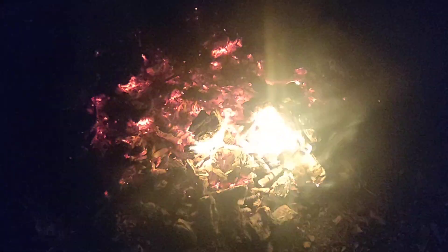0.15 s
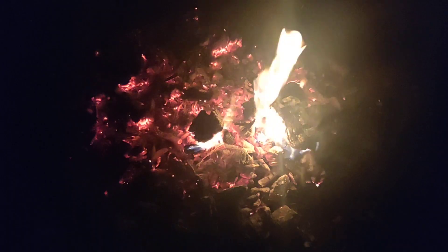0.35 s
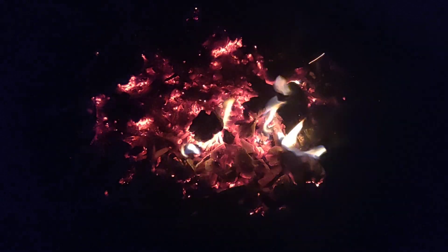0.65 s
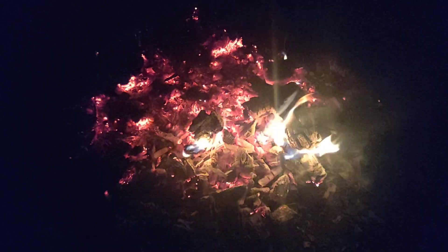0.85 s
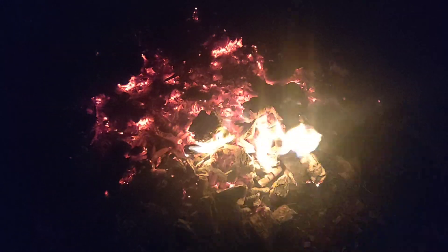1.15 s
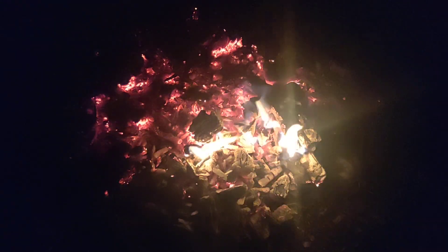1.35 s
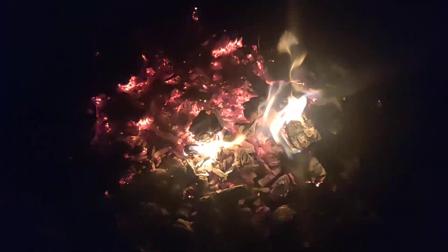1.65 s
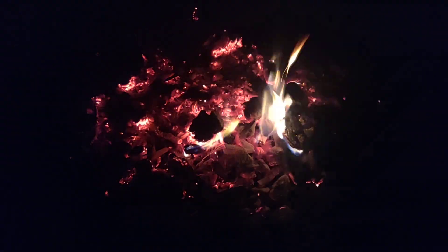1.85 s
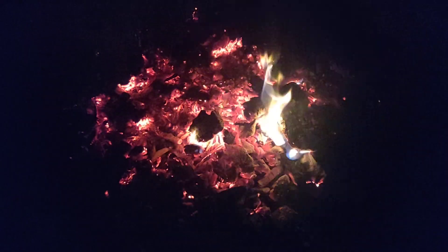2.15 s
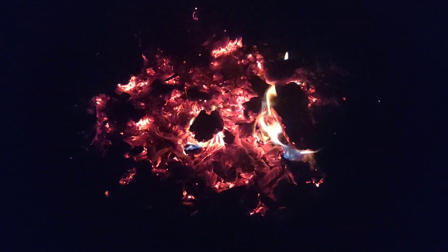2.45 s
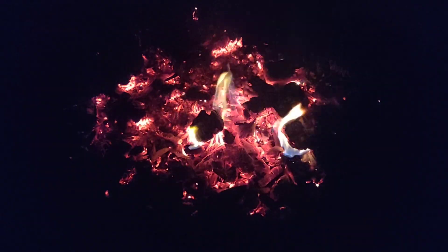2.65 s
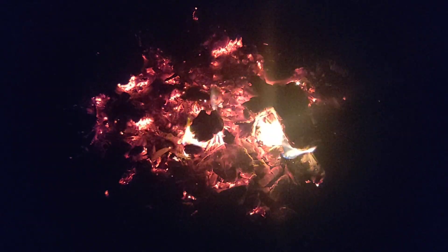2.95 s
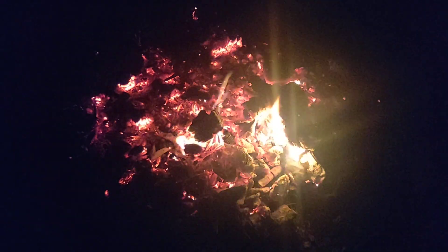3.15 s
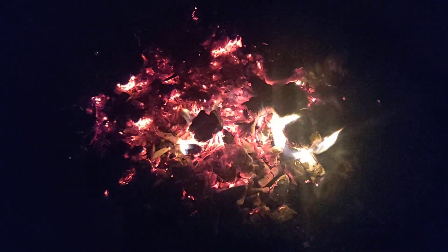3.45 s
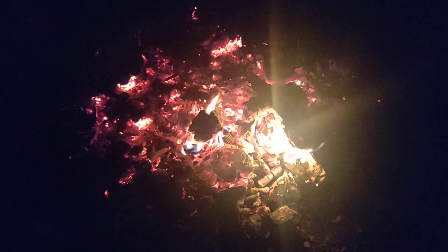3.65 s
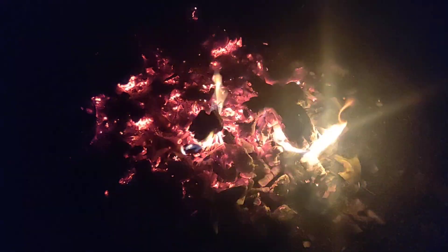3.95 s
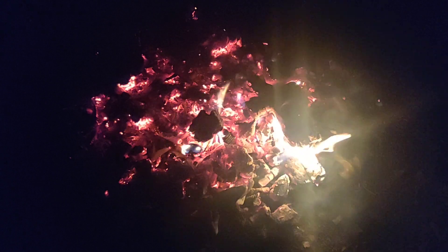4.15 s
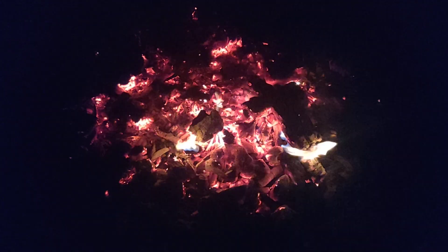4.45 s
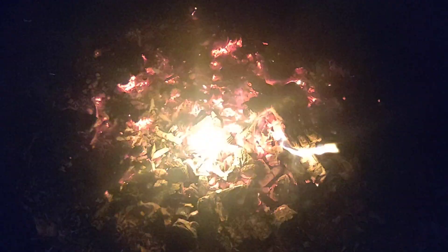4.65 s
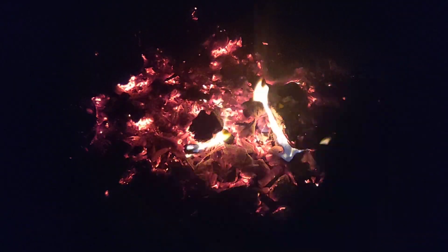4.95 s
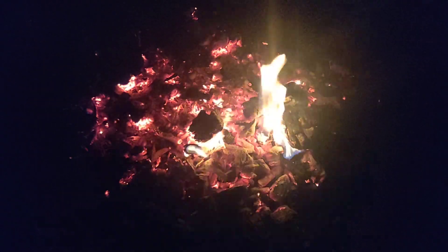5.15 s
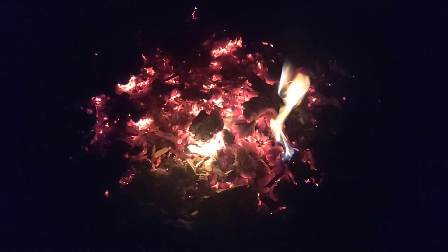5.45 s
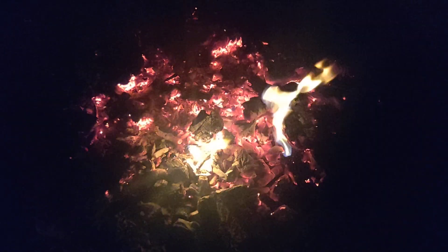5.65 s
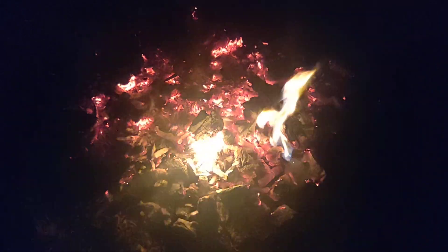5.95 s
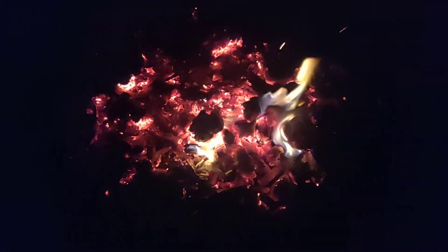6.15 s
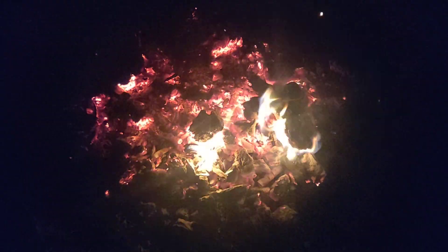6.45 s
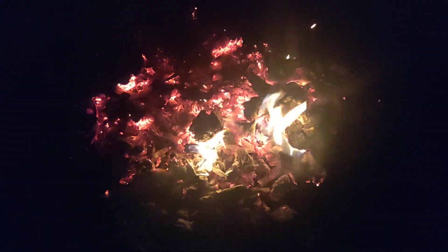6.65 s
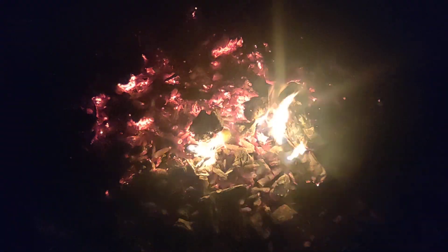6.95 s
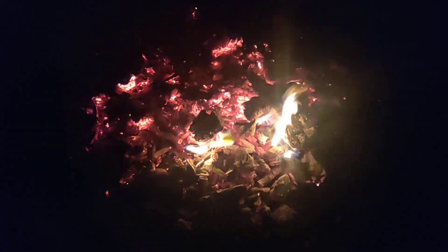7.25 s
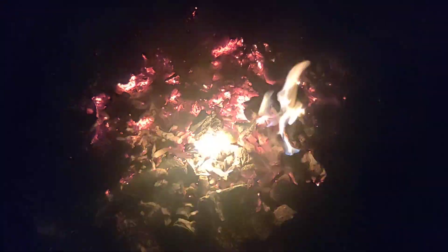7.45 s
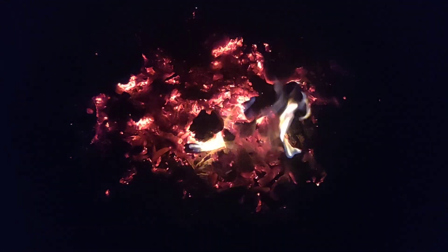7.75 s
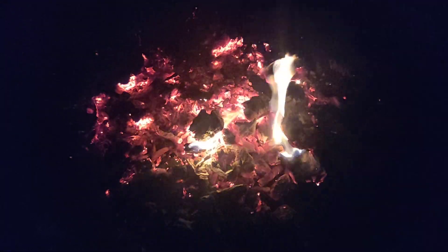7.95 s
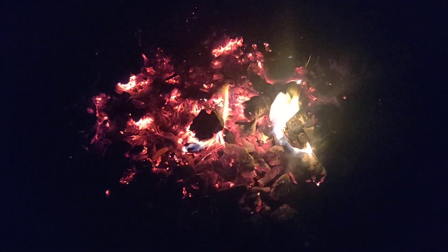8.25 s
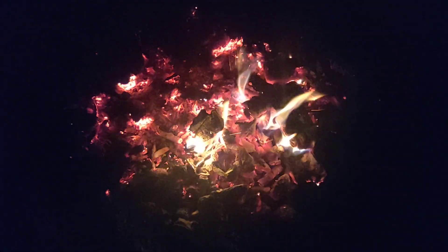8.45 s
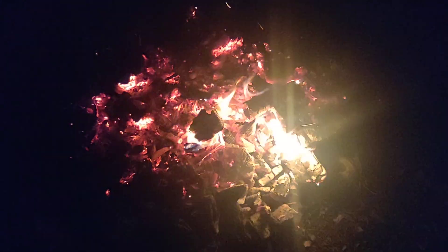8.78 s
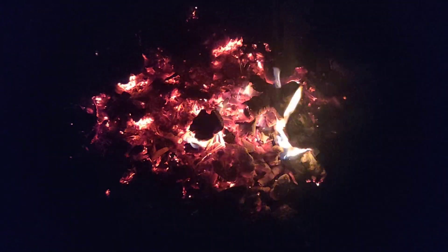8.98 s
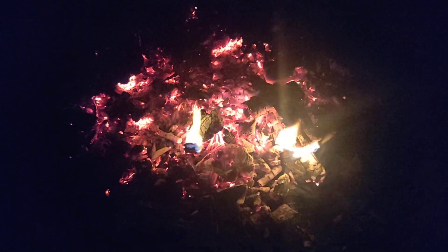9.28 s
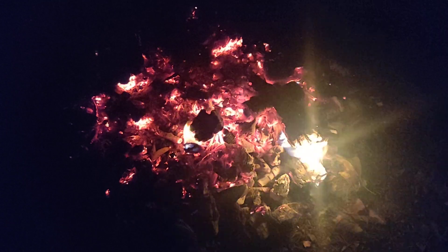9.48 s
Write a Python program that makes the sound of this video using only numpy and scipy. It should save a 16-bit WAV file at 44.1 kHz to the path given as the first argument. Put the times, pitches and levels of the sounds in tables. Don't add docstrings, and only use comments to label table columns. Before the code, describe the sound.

Glowing embers tick, snap and pop sharply at night while a near cricket chirps over far insect trills and a low distant engine rumble.

```python
import sys
import numpy as np
from scipy import signal
from scipy.fft import rfft, irfft
from scipy.io import wavfile
from scipy.ndimage import uniform_filter1d, map_coordinates

SR = 44100
rng = np.random.default_rng(int(sys.argv[2]) if len(sys.argv) > 2 else 0)


def dump_mix(stems):
    frames = np.atleast_2d(stems).T
    limited = np.clip(frames, -1, 1)
    pcm = np.round(limited * 32767).astype(np.int16)
    wavfile.write(sys.argv[1], SR, pcm)


def volts_from_decibels(level):
    exponent = np.asarray(level, float) / 20
    return 10 ** exponent


N = 424241

# frequency in Hz, density in dB per Hz.
RUMBLE_COLOUR = [(12, -54.5), (20, -2.5), (49, -1.5), (102, 0), (115, 0.5), (135, -13), (171, -18.5),
                 (200, -15), (260, -48.5), (440, -120)]
# frequency in Hz, density in dB per Hz.
ROAR_COLOUR = [(71, -19), (120, -8), (140, -3), (247, -1.5), (333, -8.5), (376, -17.5), (420, -25.5),
               (550, -54), (920, -120)]
# frequency in Hz, density in dB per Hz.
AIR_COLOUR = [(210, -47.5), (350, -7), (593, -2), (664, -2), (1120, -6), (2240, -17), (2630, -13.5),
              (3030, -9), (3390, -2), (4310, -10.5), (5570, -16.5), (6850, -11), (8850, -27),
              (14800, -26.5), (16000, -22)]
# frequency in Hz, likeness from -1 to 1.
PORT_LIKENESS = [(60, 0.94), (130, 1), (290, 0.74), (640, 0.65), (1410, -0.45), (3100, 0.19), (6820, -0.24),
                 (15000, 0.011)]
# frequency in Hz, left over right in dB.
PORT_LEAN = [(60, 2.7), (110, 2.4), (200, 2.5), (380, 1.0), (700, 1.7), (1290, 0.5), (2380, 1.6),
             (4400, 2.2), (8120, 5.5), (15000, 0.5)]
# time in seconds, roar level in dB.
ROAR_SWELL = [
    (0.0, -55),
    (4.5, -53.5),
    (8.17, -48.5),
    (8.65, -45),
    (9.62, -45),
]
# time in seconds, level in dB.
CHORUS_SWELL = [
    (0.0, -61),
    (0.24, -64),
    (8.17, -59.5),
    (8.65, -56),
    (9.62, -72),
]
# place (-1 and 1 at half height), size from 0 to 1, pitch offset in Hz.
WING_STROKE = [
    (-1.5, 0, 150),
    (-1.2, .15, 130),
    (-.95, .6, 95),
    (-.2, 1, 55),
    (.1, 1, 0),
    (.75, .8, -150),
    (1.3, .17, -310),
    (1.52, .3, -240),
    (1.75, 0, -200),
]
# start in seconds, end in seconds, period in seconds, pitch in Hz, peak in dB, left over right in dB.
LONE_TRILLS = [
    (0.011, .51, 0.046, 3170, -56.5, 11),
    (.53, .75, 0.039, 3360, -71, 5),
    (2.17, 2.72, 0.04, 3500, -57.5, 15),
]
# time in seconds, peak in dB, left over right in dB, thump in dB, crack in dB.
LOG_THUDS = [(0.9085, -27, -5, 1, -4.5), (2.6055, -26.5, 8, -27, -17), (3.1078, -14.5, 8.5, -11.5, -5),
             (3.844, -27.5, -4, -13, -14), (4.0845, -34.5, 4, -3, -15), (4.1873, -21, 5, -18, -10.5),
             (4.9827, -26.5, 5.5, -36, -13.5), (5.7019, -25.5, 8.5, -4, -12.5), (7.7178, -8, -1.5, -16, -9),
             (7.7187, -14, -6, -12.5, -7), (7.7209, -6.5, 6, -17, -9), (8.9295, -31, 19, -30, -22)]
# time in seconds, peak in dB, left over right in dB, thump in dB, crack in dB.
COAL_SNAPS = [(0.298, -43, 6, -17, -13), (0.3542, -11, 4.5, -20.5, -21), (1.1541, -14.5, 8, -26, -9),
              (2.439, -33.5, 8, -14, -12), (2.546, -44, 6, -9, -6), (3.035, -21, 9, -44, -39),
              (3.676, -13, 6, -20.5, -18.5), (6.0169, -38, 4, 0, -3), (8.703, -6.5, 1.5, -17.5, -7.5),
              (9.3513, -6.5, -3.5, -11, -7), (9.487, -39, 13.5, -9.5, -8)]
# time in seconds, peak in dB, left over right in dB, thump in dB, crack in dB.
GAS_SPITS = [(1.063, -28, 5, -18, -9.5), (1.0834, -25.5, 8, -29, -12.5), (1.3557, -22.5, -7, -26, -16),
             (4.3485, -35.5, 4.5, -11, -19), (6.507, -47, 4, -15, -7), (7.5148, -26.5, -1, -19.5, -15.5),
             (8.3069, -36, 21, -15, -15), (8.5916, -31, 2.5, -19, -8), (9.074, -29.5, 18.5, -36, -12),
             (9.2386, -39, 3, -17, -13)]
# time in seconds, peak in dB, left over right in dB, crack in dB.
CHAR_TICKS = [(0.0547, -34, 4, -19), (0.4179, -39, 15, -25), (0.4682, -33.5, 1, -19), (0.7753, -39, 5, -31),
              (1.1082, -35, 3, -1), (2.273, -32.5, 6, -25), (2.299, -36, 9, -15), (2.342, -34, 9, -25),
              (2.827, -33, 10, -33), (2.97, -38, 5, -17), (3.2804, -30.5, -1, -24), (3.3328, -32.5, 3, -15),
              (3.6173, -34, 3, -12), (3.7573, -39, 1.5, -9), (3.9428, -33.5, 9, -17), (4.045, -35, 9, -20),
              (4.112, -34.5, -4, -21), (4.137, -39, 10, -19), (4.4733, -31, 8, -26), (4.5755, -38, -3, -28),
              (4.8212, -41, 13, -24), (5.788, -34, 8, -7), (6.2842, -33, 5, -21), (6.461, -39, -2, -24),
              (6.9832, -38, 12, -11), (7.1594, -33.5, 8, -24), (7.201, -30.5, 6, -18),
              (7.347, -37.5, 9, -4), (7.88, -39, 5, -18), (8.058, -32.5, -1, -16)]
# frequency in Hz, width in Hz, level in dB.
PORT_RINGS = [
    [(3240, 880, 11.5), (6780, 880, 11), (15300, 520, -27)],
    [(4270, 406, 13), (8330, 620, 10), (15200, 880, -21)],
]
# first stroke in seconds, last stroke in seconds, first level in dB, full level in dB.
NEAR_CHIRPS = [(4.671, 4.856, -42, -27), (5.048, 5.237, -30, -26.5), (5.4102, 5.5973, -28.5, -26.5),
               (5.7756, 5.9616, -29, -26), (6.1448, 6.3277, -29, -25), (6.5287, 6.7179, -28.9, -25),
               (6.895, 7.0821, -30, -24.5), (7.2732, 7.437, -28.5, -24.5), (7.6403, 7.8298, -29, -24.5),
               (8.027, 8.22, -28.8, -24.5), (8.4398, 8.629, -28, -24.5), (8.854, 9.0192, -28.1, -24.5),
               (9.2444, 9.41, -29, -24.5)]
# multiple of the pitch, level in dB.
WING_OVERTONES = [
    (2, -29),
    (3, -35),
    (4, -47),
    (5, -42),
]
# middle in seconds, peak in dB, length in ms, pitch in Hz.
ANSWER_STROKES = [(8.226, -47, 12, 3560), (8.33, -49, 12, 3450), (8.393, -44, 13, 3610),
                  (8.445, -44, 13, 3620), (8.497, -44, 13, 3610), (8.547, -44, 13, 3590),
                  (8.6, -45, 13, 3580), (8.652, -44, 13, 3580), (8.757, -50, 12, 3480),
                  (8.81, -46, 13, 3530), (8.865, -47, 13, 3550), (8.917, -46, 13, 3540),
                  (8.972, -47, 13, 3530), (9.605, -49, 12, 3510)]
# frequency in Hz, level in dB.
WING_COLOURS = [
    [(3500, -1.2), (6300, 2.5), (9000, -8), (10400, -16), (12300, 0), (14200, -14), (15600, 4)],
    [(3500, 1.0), (6300, -2.4), (9000, 2.6), (10400, -14), (12300, 0), (14200, -16), (15600, -11)],
]
# middle in seconds, half length in seconds, level in dB.
WIND_SWELLS = [
    (5.03, 0.17, -50),
    (6.45, 0.6, -53),
    (7.703, 0.54, -51),
    (9.3, 0.96, -44),
]
# time in seconds, pitch in Hz, level in dB.
GEAR_WHINE = [
    (7.4, 447, -86),
    (7.9, 444, -69),
    (8.25, 442, -73),
    (8.7, 438, -66),
    (9.0, 436, -69),
    (9.2, 435, -88),
]
# time in seconds, pitch in Hz, level in dB.
LOW_DRONE = [
    (8.5, 164, -91),
    (8.9, 162, -64),
    (9.4, 161, -51),
    (9.62, 163, -80),
]


def unit(x):
    return x / np.sqrt(np.mean(x ** 2) + 1e-20)


def along(points, hz):
    f, v = np.transpose(points)
    return np.interp(np.log(hz + 1), np.log(f + 1), v)


def curves(rows):
    s, *cols = np.transpose(rows)
    return [np.interp(np.arange(N) / SR, s, c) for c in cols]


def wobble(rate):
    knots = rng.standard_normal(int(N * rate / SR) + 4)
    return map_coordinates(knots, [np.arange(N) * rate / SR])


def rush(spectrum, patchy_db):
    hz, _, z = signal.stft(rng.standard_normal((2, N)), SR, nperseg=2048)
    field = uniform_filter1d(rng.standard_normal(z.shape[1:]), size=8, axis=0)
    field = uniform_filter1d(field, size=3, axis=1)
    turn = np.arccos(np.clip(along(PORT_LIKENESS, hz), -1, 1))[:, None] / 2
    mid, side = z[0] * np.cos(turn), z[1] * np.sin(turn)
    lean = volts_from_decibels(along(PORT_LEAN, hz) / 2)[:, None]
    pair = np.array([(mid + side) * lean, (mid - side) / lean])
    gain = volts_from_decibels(along(spectrum, hz)[:, None] + patchy_db * unit(field))
    return unit(signal.istft(pair * gain, SR, nperseg=2048)[1][:, :N])


def night_bed():
    roar_db, = curves(ROAR_SWELL)
    rumble = volts_from_decibels(-42.5 + 0.22 * (roar_db + 51.5)) * rush(RUMBLE_COLOUR, patchy_db=-0.87)
    roar = volts_from_decibels(roar_db) * rush(ROAR_COLOUR, patchy_db=1.0)
    air = volts_from_decibels(-54.5 + 0.2 * (roar_db + 49.5)) * rush(AIR_COLOUR, patchy_db=1.7)
    return rumble + roar + air


def cricket(strokes, glide, rough, overtones=(), scrape_db=-90):
    s, db, ms, hz = np.transpose(strokes)[:, :, None]
    t = (np.arange(1400) - 700) / SR
    place, size, offset_hz = np.transpose(WING_STROKE)
    u = t / (ms / 2000)
    swell = uniform_filter1d(np.interp(u, place, size), size=30, axis=1)
    teeth = uniform_filter1d(rng.standard_normal((3, *u.shape)), size=50, axis=2) * np.sqrt(50)
    pitch = hz + glide * np.interp(u, place, offset_hz) + 500 * rough * teeth[0]
    phase = 2 * np.pi * (np.cumsum(pitch, axis=1) / SR + rng.random(s.shape))
    tone = np.sin(phase)
    for k, level in overtones:
        tone = tone + volts_from_decibels(level) * np.sin(k * phase + .55 * teeth[2]) * (1 + .6 * teeth[1])
    band = signal.butter(3, [3900, 5000], "bandpass", fs=SR, output="sos")
    scrape = signal.sosfilt(band, rng.standard_normal(u.shape))
    wave = volts_from_decibels(db) * swell * ((1 + rough * teeth[1]) * tone + volts_from_decibels(scrape_db - 5.7 * u) * scrape)
    at = np.clip(np.round(s * SR) + np.round(t * SR), 0, N)
    return np.bincount(at.astype(int).ravel(), wave.ravel(), N + 1)[:N]


def chorus(count=1100):
    draw = rng.random((2, count, 3))
    spread = rng.standard_normal((2, count))
    sides = []
    for d, p in zip(draw, spread):
        rows = np.c_[d[:, 0] * N / SR, 6 * d[:, 1], 10 + 6 * d[:, 2], 3400 + 90 * p]
        sides.append(cricket(rows, glide=0.26, rough=0.13))
    level_db, = curves(CHORUS_SWELL)
    return volts_from_decibels(level_db + 1.0) * unit(np.array(sides) * volts_from_decibels([[2.1], [-2.1]]))


def trills():
    out = np.zeros((2, N))
    for start, end, period, hz, db, pan_db in LONE_TRILLS:
        s = np.arange(start, end, period)
        rows = np.c_[s, db + 1.5 * rng.standard_normal(len(s)), 14 + 0 * s, hz + 0 * s]
        out += cricket(rows, glide=0.43, rough=0.095) * volts_from_decibels([[pan_db / 2], [-pan_db / 2]])
    return out


def pops():
    thuds = [(*p, -39 - 0.6 * max(p[1] + p[3] + 35, 0)) for p in LOG_THUDS]
    snaps = [(*p, -31.5) for p in COAL_SNAPS]
    spits = [(*p, -25.5) for p in GAS_SPITS]
    ticks = [(s, db, pan_db, -26, crack_db, -32.5) for s, db, pan_db, crack_db in CHAR_TICKS]
    return thuds + snaps + spits + ticks


def port_response(hz):
    ports = []
    for port in PORT_RINGS:
        rings = [(-1) ** k * volts_from_decibels(db) * 1j * hz * w / (c * c - hz * hz + 1j * hz * w)
                 for k, (c, w, db) in enumerate(port)]
        ports.append(sum(rings))
    return np.array(ports)


def minimum_phase(colour_db, size):
    cepstrum = irfft(colour_db * np.log(10) / 20, size)
    cepstrum[1:size // 2] *= 2
    cepstrum[size // 2 + 1:] = 0
    return np.exp(rfft(cepstrum))


def embers(size=4096):
    out, t, hz = np.zeros((2, N + size)), np.arange(size) / SR, np.fft.rfftfreq(size, 1 / SR)
    case_delay_s = np.array([[.00035], [.0001]])
    case = np.exp(-2j * np.pi * hz * case_delay_s) / (1 + (hz / 2200) ** 4)
    ports = port_response(hz)
    scatter = volts_from_decibels(-23 - 60 * t / .045) * np.where(t < .0075, 1, volts_from_decibels(-5))
    for s, db, pan_db, thump_db, crack_db, sizzle_db in pops():
        gas = np.diff(rng.standard_normal((3, size + 1)))
        spit = (0.5 * gas[0] + gas[1:]) * (volts_from_decibels(-6.5 - 60 * t / 0.0037) + scatter)
        spit[0, 2] += 1
        spit[1, rng.integers(0, 4)] += 1
        bounce_s = rng.uniform(0.0028, 0.003)
        spit += volts_from_decibels(-16.5) * np.roll(spit, round(bounce_s * SR), axis=1)
        colour_db = along([(250, thump_db + 11.0), (500, thump_db + 20), (1500, thump_db + 28),
                           (3800, crack_db + 15.5), (6500, 0), (10300, sizzle_db + 20),
                           (12500, sizzle_db + 20), (15500, sizzle_db + 28.5)], hz)
        lean = volts_from_decibels(np.array([[.5], [-.5]]) * (pan_db - 3))
        pop = irfft(rfft(spit) * minimum_phase(colour_db, size) * (case + lean * ports), size)
        start = round((s + .0009) * SR)
        out[:, start:start + size] += volts_from_decibels(db + 5.0) * pop * np.clip((t[-1] - t) / .02, 0, 1)
    return out[:, :N]


def chirp_strokes():
    beat_s, warm_s = .0275, 4.1
    settle, cold_build, warm_build = .52, 0.67, 0.31
    rows = []
    for first, last, first_db, full_db in NEAR_CHIRPS:
        k = np.arange(round((last - first) / beat_s) + 1)
        beat = last - beat_s * k[::-1]
        warmth = np.clip((first - NEAR_CHIRPS[0][0]) / warm_s, 0, 1)
        chance = rng.standard_normal((len(k), 3))
        build = cold_build + (warm_build - cold_build) * warmth
        db = full_db + (first_db - full_db) * build ** k + 0.27 * chance[:, 0]
        haste = (first - beat[0]) * settle ** k
        ms = (13.4 + 0.079 * (first - 5)) * volts_from_decibels(0.18 * (db + 27.5))
        ms = ms - 0.14 * 1000 * haste + 0.45 * chance[:, 1]
        rows += list(np.c_[beat + haste + .0003 * chance[:, 2], db, ms])
    return np.array(rows)


def echoes(x, t60, delay):
    t = np.arange(SR // 2) / SR
    tail = rng.standard_normal((2, len(t))) * volts_from_decibels(-60 * t / t60) * (t > delay)
    return signal.fftconvolve(x[None], tail / np.linalg.norm(tail[0]), axes=1)[:, :N]


def near_crickets():
    rows = chirp_strokes()
    pitch = np.maximum(3040.0 + 17 * (rows[:, 1] + 24), 2960) + 8 * rng.standard_normal(len(rows))
    near = cricket(np.c_[rows, pitch], glide=1.19, rough=0.015, overtones=WING_OVERTONES, scrape_db=-24.5)
    both = rfft(near + cricket(ANSWER_STROKES, glide=0.34, rough=0.037))
    hz = np.fft.rfftfreq(N, 1 / SR)
    direct = irfft(both * volts_from_decibels([along(port, hz) for port in WING_COLOURS]), N)
    leaves_db = along([(3500, -24), (4000, -5), (9500, -8), (10500, -18)], hz)
    scattered = irfft(both * volts_from_decibels(leaves_db), N)
    return direct + echoes(scattered, t60=.2, delay=.003)


def hum(hz, db, drift_hz, flutter_db):
    level = volts_from_decibels(db + 1.5 + flutter_db * wobble(3.9))
    return level * np.sin(2 * np.pi * np.cumsum(hz + drift_hz * wobble(8)) / SR)


def engine():
    t = np.arange(N) / SR
    carried_db = np.max([db - 11 * ((t - s) / half) ** 2 for s, half, db in WIND_SWELLS], axis=0)
    hz = 319.5 - 8.15 * t
    tones = hum(hz, carried_db, drift_hz=1.16, flutter_db=2.0)
    tones = tones + hum(hz * (1 + 1 / 3), carried_db - 15, drift_hz=1.58, flutter_db=3.5)
    tones = tones + hum(*curves(GEAR_WHINE), drift_hz=1.2, flutter_db=1.5)
    tones = tones + hum(*curves(LOW_DRONE), drift_hz=1.5, flutter_db=3.5)
    return tones * volts_from_decibels([[1.1], [-1.1]])


def scene():
    return night_bed() + chorus() + trills() + embers() + near_crickets() + engine()


def low_pass(x):
    return signal.sosfilt(signal.butter(12, 16500, fs=SR, output="sos"), x)


def record(dry):
    soft = dry / (1 + abs(dry / .93) ** 6) ** (1 / 6)
    hz = np.fft.rfftfreq(N, 1 / SR)
    band_db = along([(15800, 0), (16000, -22), (16600, -30), (16800, -120)], hz)
    mix = irfft(rfft(soft) * volts_from_decibels(band_db), N)
    return low_pass(mix)


dry = scene()
out = record(dry)
dump_mix(out)
```